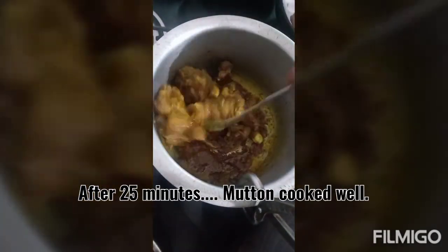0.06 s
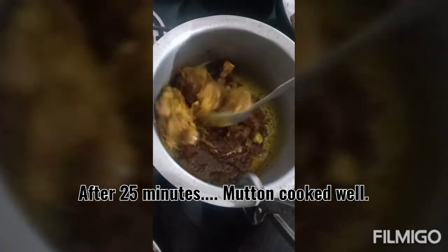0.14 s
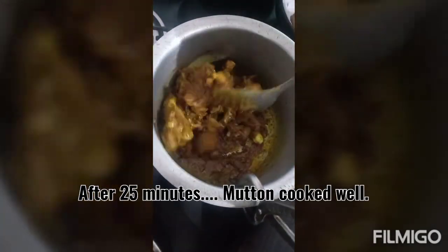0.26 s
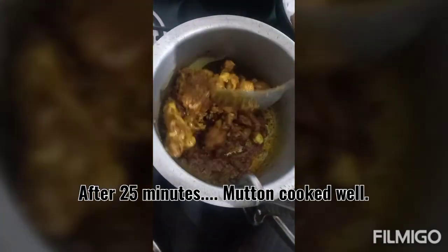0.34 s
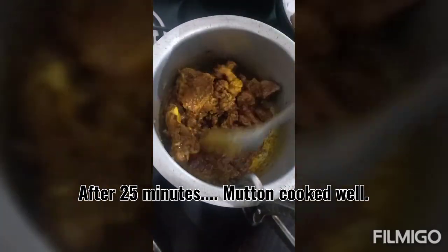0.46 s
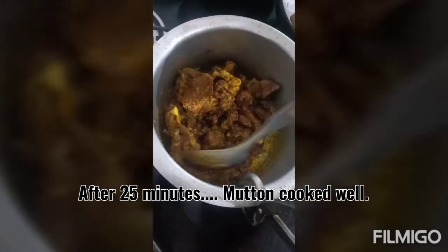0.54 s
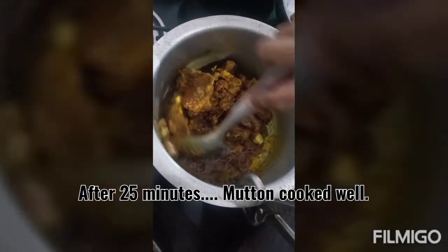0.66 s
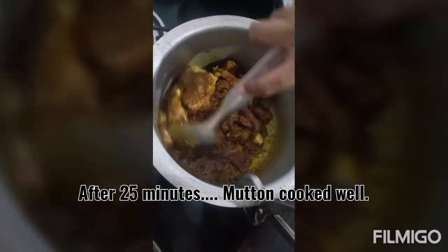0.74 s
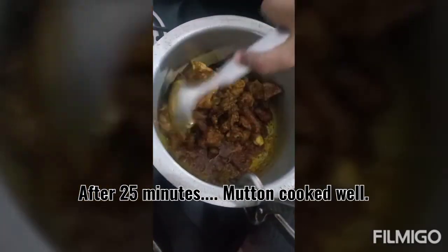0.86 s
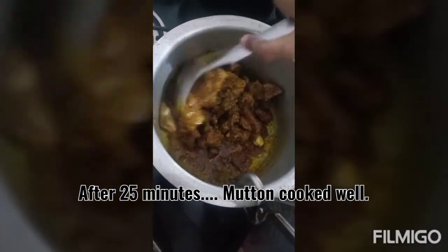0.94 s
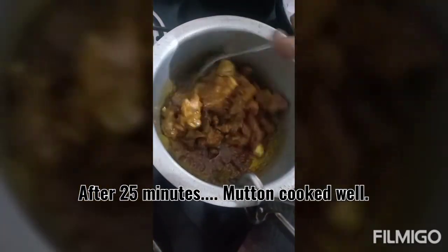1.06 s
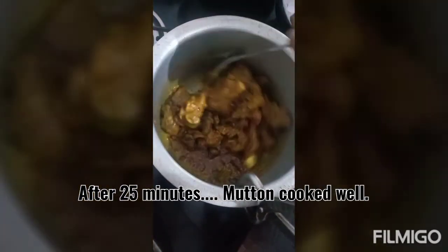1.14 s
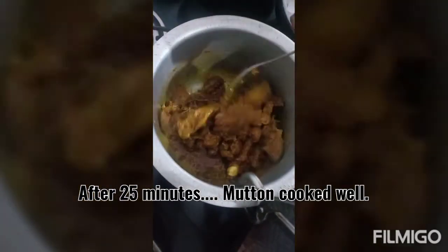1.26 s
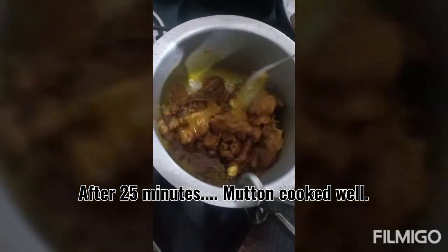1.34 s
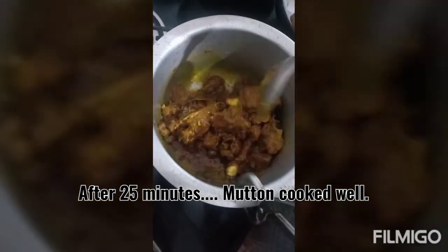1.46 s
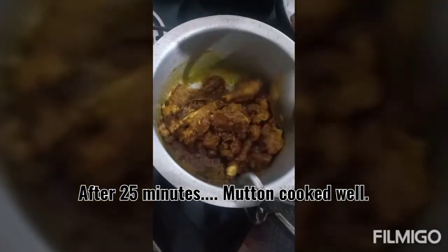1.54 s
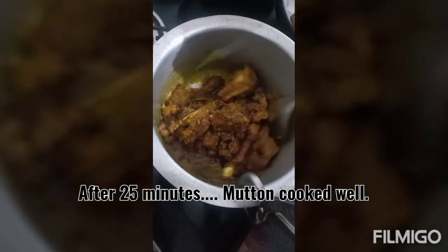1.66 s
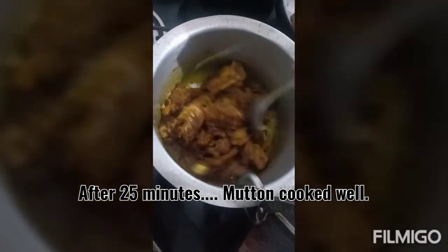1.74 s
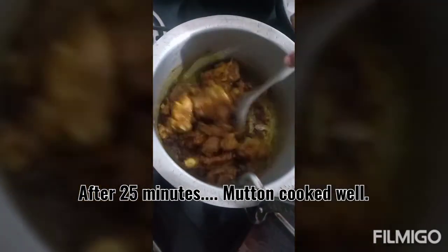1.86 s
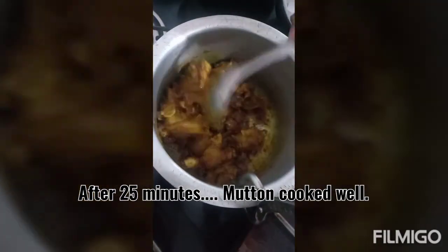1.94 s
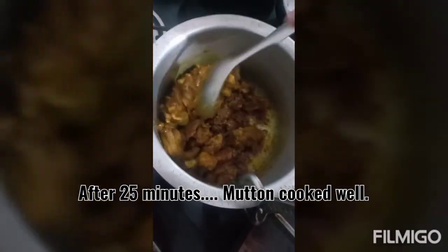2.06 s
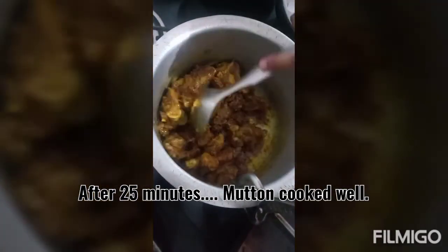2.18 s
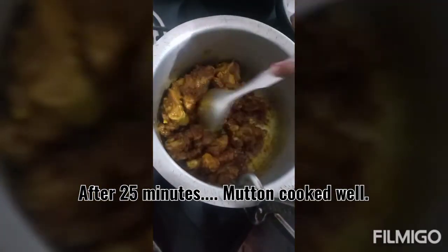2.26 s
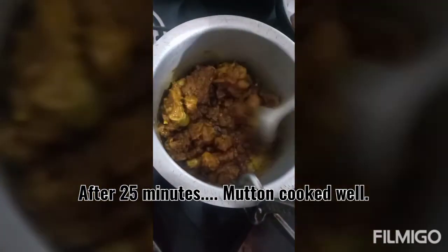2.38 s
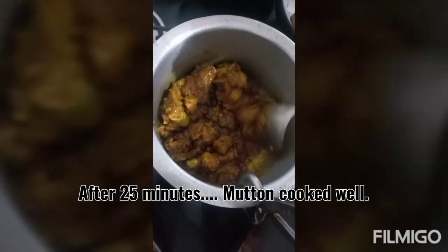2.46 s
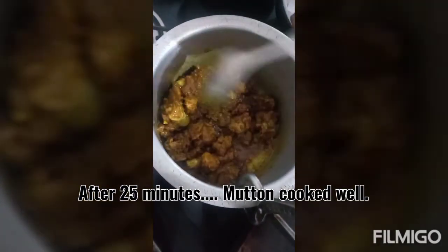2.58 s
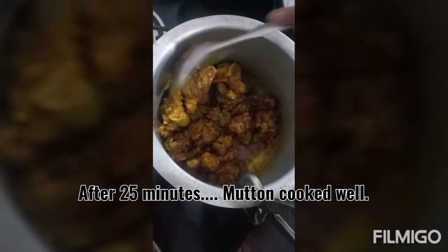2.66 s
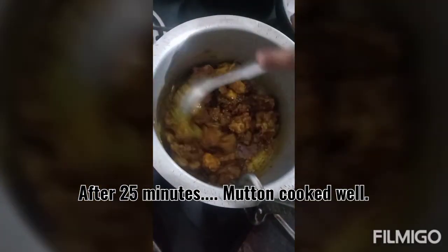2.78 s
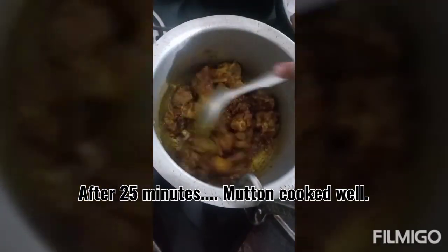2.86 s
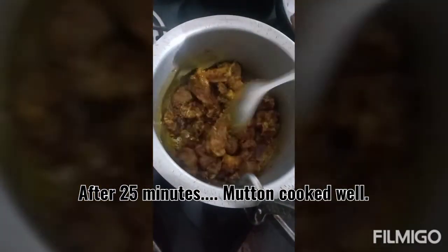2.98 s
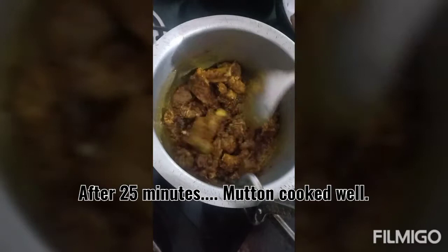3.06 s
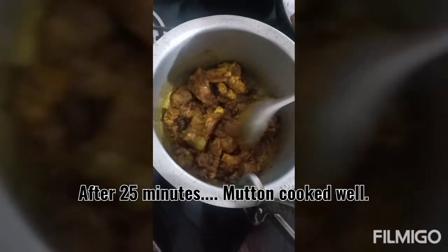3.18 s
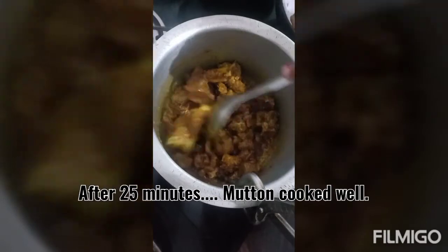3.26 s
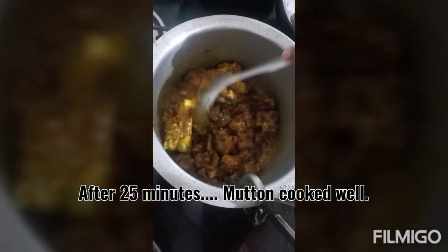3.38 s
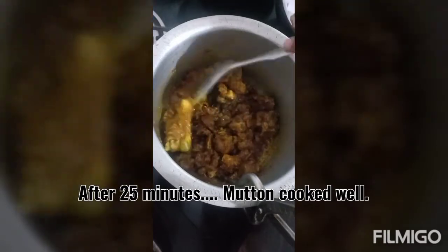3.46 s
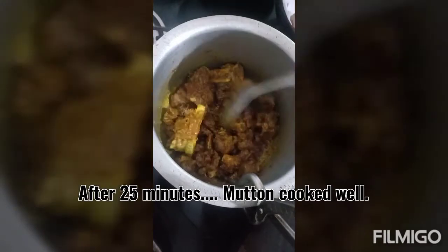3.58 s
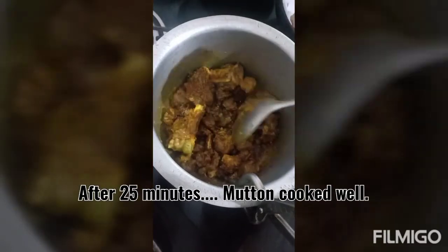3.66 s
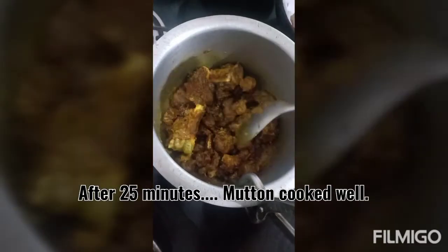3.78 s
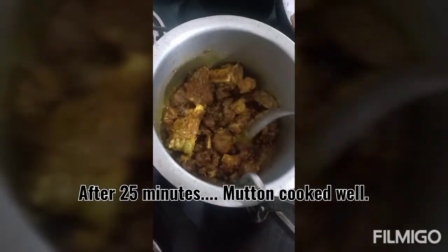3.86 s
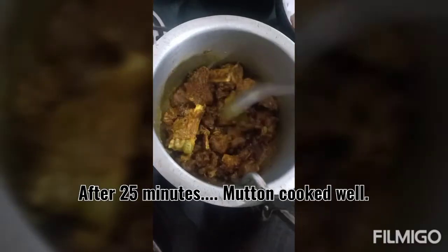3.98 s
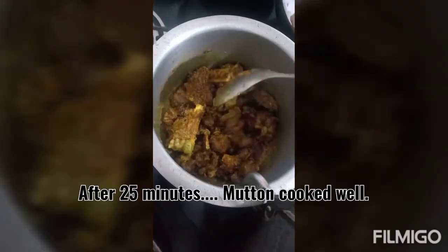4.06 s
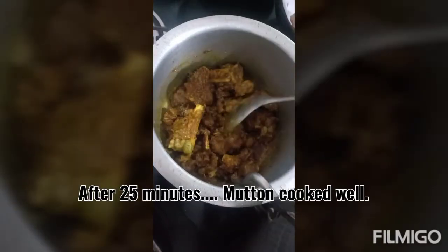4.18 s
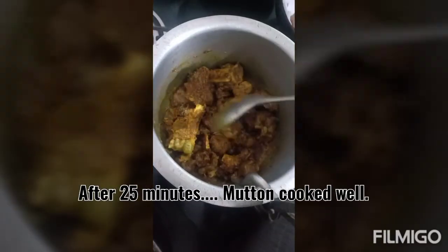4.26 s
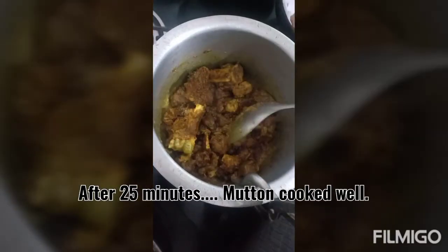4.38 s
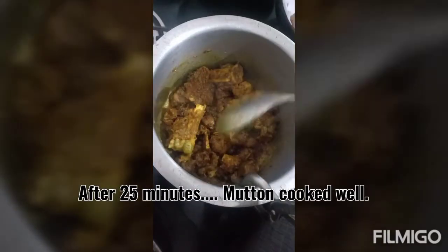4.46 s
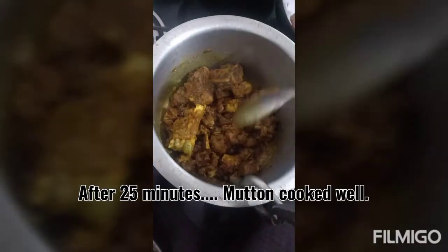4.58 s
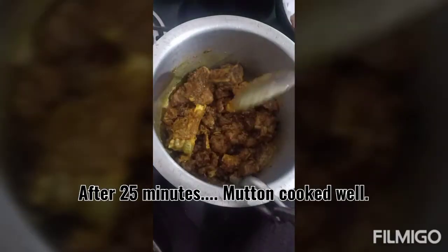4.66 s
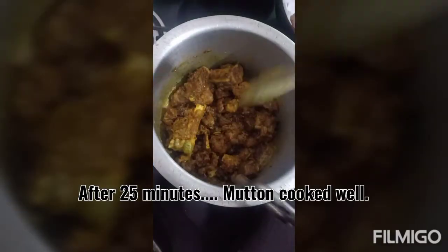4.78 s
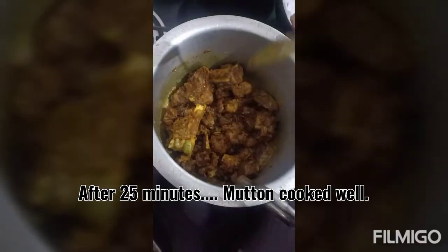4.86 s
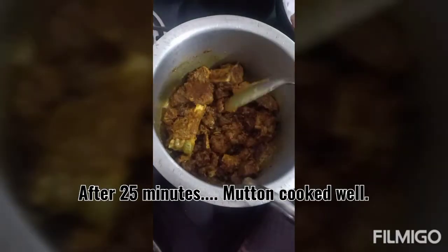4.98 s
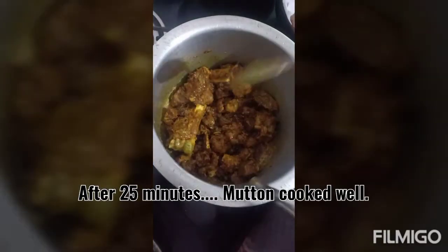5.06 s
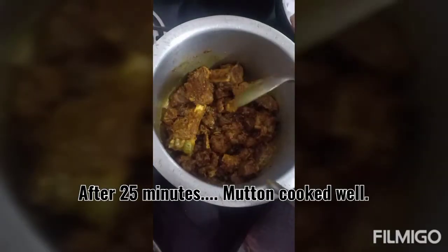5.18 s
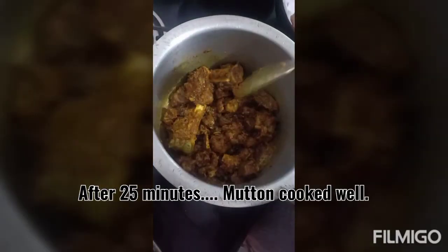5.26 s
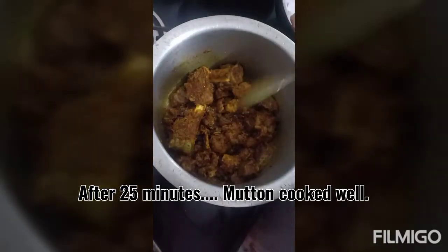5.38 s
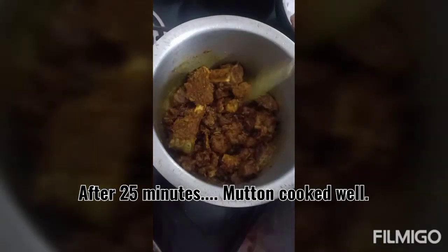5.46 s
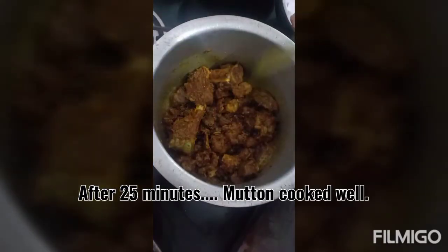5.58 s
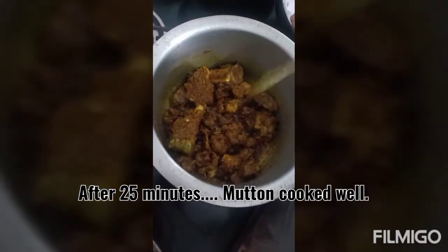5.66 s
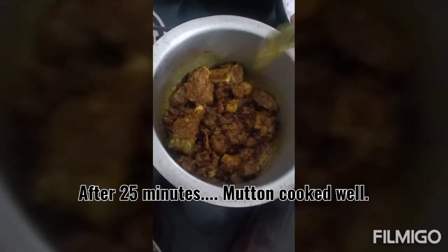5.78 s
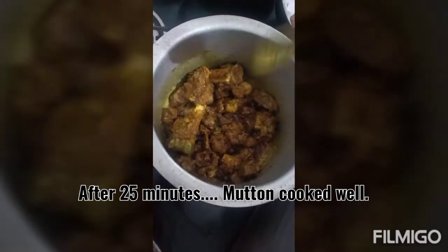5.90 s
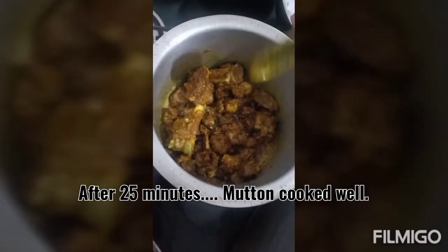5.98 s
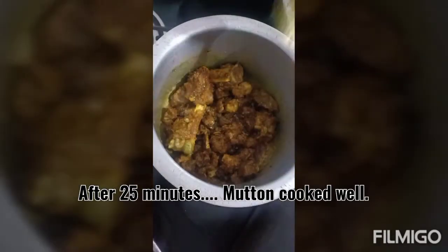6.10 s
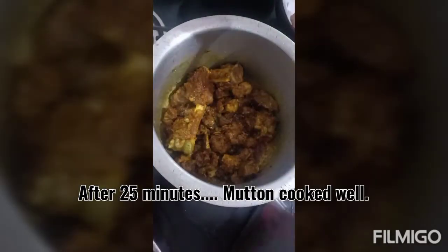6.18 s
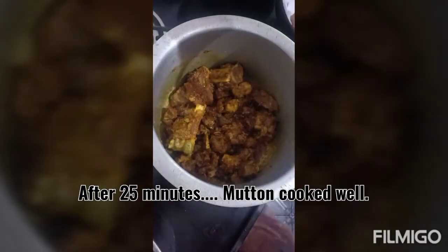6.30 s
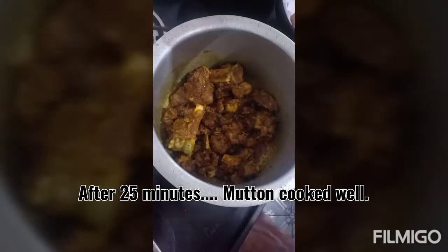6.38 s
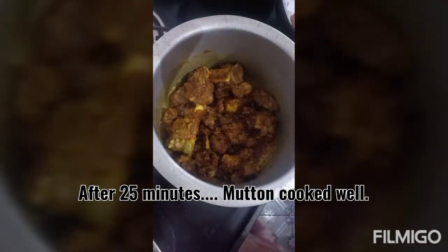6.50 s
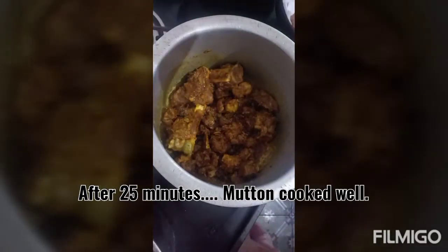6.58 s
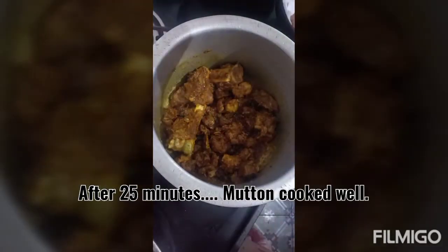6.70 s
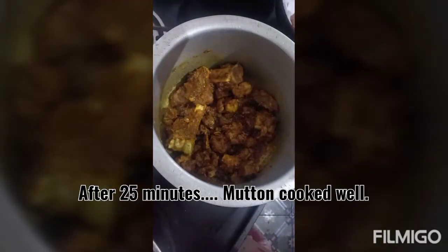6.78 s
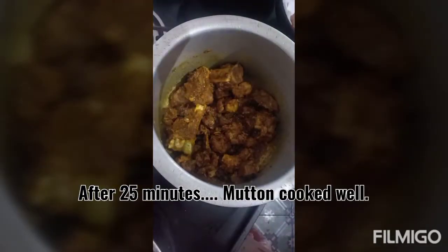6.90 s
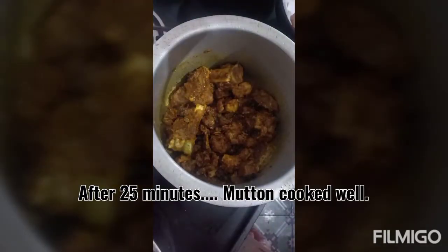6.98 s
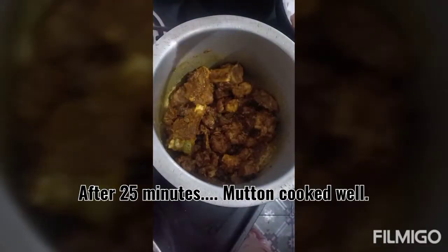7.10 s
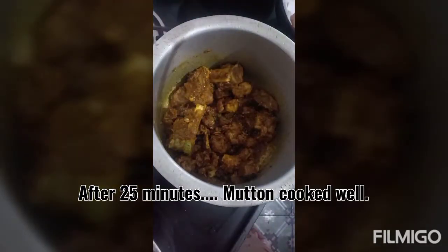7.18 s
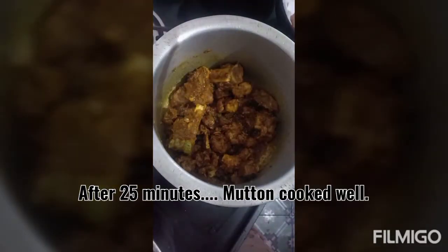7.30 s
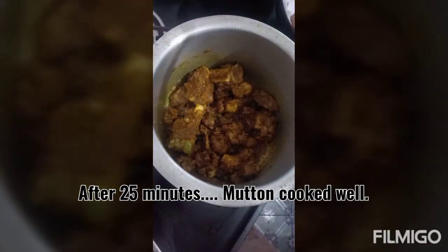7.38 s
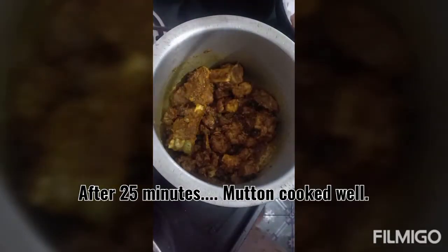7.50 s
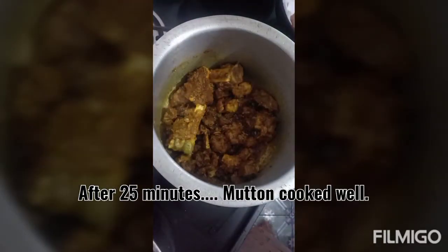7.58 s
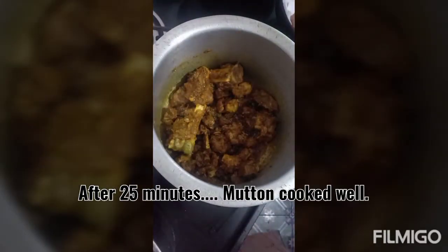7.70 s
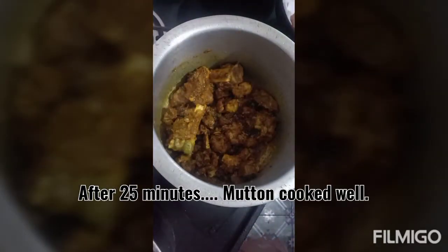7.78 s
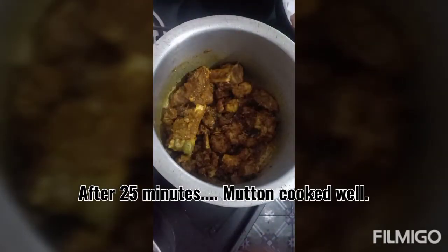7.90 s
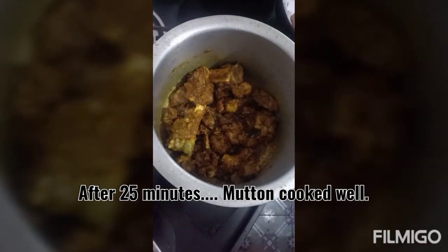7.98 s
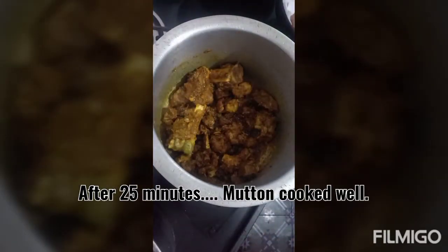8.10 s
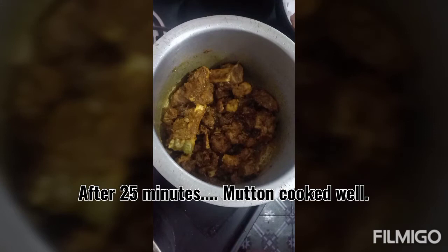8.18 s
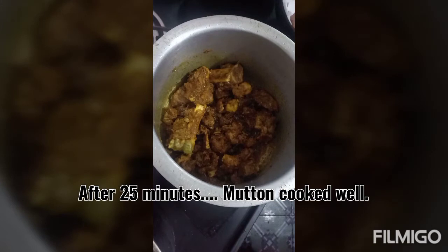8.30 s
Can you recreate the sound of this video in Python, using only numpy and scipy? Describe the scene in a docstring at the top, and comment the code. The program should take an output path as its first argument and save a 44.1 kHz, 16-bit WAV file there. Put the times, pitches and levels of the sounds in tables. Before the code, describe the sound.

A metal ladle stirs thick cooked meat in an aluminium pot, close by in a small, slightly echoing kitchen. It scrapes and bumps the bottom while the gravy squelches softly, and clanks sharply against the side three times. The ladle is then rapped on the rim, which rings briefly. A few quieter clacks and slides follow further off as it is put away. A faint appliance hum and soft hiss continue throughout.

```python
"""A small hard-walled kitchen: a metal ladle stirs thick cooked meat in an aluminium pot.
It scrapes and bumps the bottom while gravy crackles and pops, clanks on the wall, whose modes ring,
and is rapped on the rim to shake it clean. A few clacks and slides follow beside the stove as it is
put away. An appliance hums faintly under soft room hiss."""
import sys
import numpy as np
from scipy import signal
from scipy.fft import rfft, irfft
from scipy.io import wavfile

SR = 44100
rng = np.random.default_rng(int(sys.argv[2]) if len(sys.argv) > 2 else 0)


def log_audio(samples):
    """Write samples as a 16-bit WAV file to the path given in sys.argv[1]."""
    # one column per channel
    frames = np.atleast_2d(samples).T
    # limit to full scale, then quantise
    limited = np.clip(frames, -1, 1)
    pcm = np.round(limited * 32767).astype(np.int16)
    wavfile.write(sys.argv[1], SR, pcm)


N = 368115

# ladle on the bottom, through the meat: start_s, force_db, spot_hz (pitch the struck spot favours)
BOTTOM_BUMPS = [(0.002, -35.5, 626), (0.174, -36, 800), (0.4045, -31.5, 1500), (0.4805, -39.5, 1516),
                (0.555, -42.5, 625), (1.74, -44, 650), (2.291, -44.5, 570), (2.449, -37.5, 560),
                (2.955, -44.5, 560), (2.972, -40, 580), (3.055, -49, 555), (3.985, -43, 590)]
# ladle on the wall: start_s, force_db, bright_db, height_frac, ring_db, spot_hz, damping_ratio
WALL_CLANKS = [(1.0744, -13.5, 10, 0.06, -25, 3600, 1.8), (1.1115, -21.5, -4, 0.18, -24, 630, 2.4),
               (1.7657, -11, 4.5, 0.58, -14, 2250, 6), (1.7987, -26.5, -14, 0, -29.5, 2690, 1.2),
               (1.8208, -20.5, -9, 0.07, -24, 614, 3), (1.8375, -20.5, -13, 0.02, -26.5, 1810, 1.6),
               (3.837, -12.5, -6, 0.08, -21.5, 4200, 4.5), (3.857, -41, -14, .5, -26.5, 2068, 1.09),
               (4.863, -26, -12, 0.74, -31.5, 2080, 2.5), (4.878, -31.5, -16, .9, -36, 2670, 1.4),
               (4.969, -29.5, -11, 0.1, -39.5, 2180, 1.8), (5.136, -11, 8.5, 1, -20.5, 2320, 1.05),
               (5.198, -25, 8, 1, -25.5, 2035, 1.12), (5.2362, -27, 6, 0.8, -26.5, 2540, 1.5),
               (5.26, -18, -4.5, 0.99, -27, 4560, 2)]
def contacts():
    """Yields each blow of the ladle; the higher on the wall, the less thud."""
    for start_s, force_db, spot_hz in BOTTOM_BUMPS:
        thud_db, bright_db, ring_db, damping = 9.5, -3, force_db - 10, 1.11
        yield start_s, force_db, thud_db, bright_db, ring_db, spot_hz, damping
    for start_s, force_db, bright_db, height, ring_db, spot_hz, damping in WALL_CLANKS:
        thud_db = 2.5 - 41 * height
        yield start_s, force_db, thud_db, bright_db, ring_db, spot_hz, damping


# pot bottom: freq_hz, level_db, t60_s
BOTTOM_MODES = [(460, -13, .07), (565, -9, .08), (630, 0, .15), (680, -9, .1), (800, -10, .05)]
# detuning by the meat: time_s, pitch_ratio
MEAT_LOADING = [(0, 0.99), (.17, 1.09), (.44, 0.98), (1.1, 1.06), (1.8, .95), (2.45, 1.02), (3, 0.89),
                (3.85, 0.94)]
def bottom_thud(start_s, damping):
    """The bottom's pitch shifts as meat is pushed over it."""
    pitch_ratio = np.interp(start_s, *np.transpose(MEAT_LOADING))
    return ring(np.array(BOTTOM_MODES) * [pitch_ratio, 1, 1], damping=damping)


# free pot wall: freq_hz, level_db, t60_s
WALL_MODES = [(568, -20, .55), (626, -17, .66), (655, -22, .55), (1511, -9, .66), (2126, -3, .65),
              (2148, -7, .65), (2395, -5, .56), (2605, -7.5, .56), (2795, -15, .48), (4091, -13, .42),
              (4163, -11, .6), (4544, -10, .52), (4768, -12, .6), (5080, -10, .55), (5135, -13, .54),
              (5578, -9, .45), (5988, -10, .6), (6169, -17, .45), (6810, -19, .5)]
# metal on metal: freq_hz, density_db
CLANK_SPECTRUM = [(40, -36), (200, -21), (310, -7.5), (385, -19.5), (470, -1.5), (750, -1.5), (1020, -6),
                  (1750, -7), (2250, 1.5), (3300, -13.5), (5100, -2.5), (6500, -11), (8200, -21.5),
                  (14500, -24.5)]
def blows(overtones=44):
    """Each blow gives a short clank, a bottom thud, a wall ring and a shimmer of high overtones."""
    clanks, thuds, rings = np.zeros((3, 2, N))
    mode_hz = np.array(WALL_MODES)[:, :1]
    high_hz = np.linspace(6900, 14000, overtones) + rng.uniform(-60, 53, overtones)
    high_db = lookup(CLANK_SPECTRUM, high_hz) + rng.normal(0, 3.5, overtones)
    shimmer = ring(np.column_stack([high_hz, high_db, np.full(overtones, .4)]))
    for start_s, force_db, thud_db, bright_db, ring_db, spot_hz, damping in contacts():
        def tone_db(hz):
            modes_db = 7 * bell(hz, mode_hz[3:], .012).max(0)
            edge_db = bright_db * (bell(hz, 22000, 2.8) + 0.48 * bell(hz, 15400, 0.4))
            meat_slap_db = 0.29 * max(thud_db + 9, 0) * bell(hz, 800, 0.18)
            spot_db = 5 * bell(hz, spot_hz, 0.24)
            low_db = 0.37 * thud_db * bell(hz, 490, 0.79)
            return lookup(CLANK_SPECTRUM, hz) + modes_db + edge_db + meat_slap_db + spot_db + low_db
        add(clanks, start_s, amp(force_db) * burst(tone_db, t60_s=0.043))
        add(thuds, start_s, amp(force_db + thud_db - 2.5) * bottom_thud(start_s, damping))
        wall_damping = np.where(mode_hz < 1000, 1, damping)  # the pressing ladle spares the low modes
        wall = ring(WALL_MODES, 15 * bell(mode_hz, spot_hz, 0.063) - 2, wall_damping)
        add(rings, start_s, amp(ring_db) * wall)
        add(rings, start_s, amp(force_db + bright_db - 24.5) * shimmer)
    low_cut = signal.butter(2, 340, "highpass", fs=SR, output="sos")  # thuds and rings carry little deep bass
    thuds, rings = signal.sosfilt(low_cut, [thuds, rings])
    return clanks + thuds + rings + kitchen(amp(-2) * clanks + amp(-5) * thuds + amp(-9) * rings)


def rim_note(start_s=5.165, pitch_hz=1515.5, level_db=-16.5, t60_s=0.57, swells_per_s=3.73):
    """The rap's note travels round the rim, so it swells after the blow, then fades."""
    out = np.zeros((2, N))
    note = ring([(pitch_hz, level_db, t60_s)])
    swell = np.sin(np.pi * swells_per_s * np.arange(note.shape[1]) / SR)
    add(out, start_s, note * swell)
    return out + amp(-14.5) * kitchen(out)


# hand-held bowl and shank: freq_hz, level_db, t60_s
LADLE_MODES = [(2200, -3, .1), (2262, -2, .2), (2420, -3, .18), (2802, -2, .22), (3280, -12, .18),
               (3800, -7, .2), (4341, -5, .18), (4420, -7, .15), (4983, -5, .17), (5134, -6, .18),
               (5215, -4, .2), (6200, -11, .18), (6850, -10, .2)]
# ladle skipping: start_s, length_s, rattle_db, bright_db, ring_db
CHATTERS = [(1.077, 0.05, -29.5, -11, -21), (1.784, 0.051, -30, 9, -30), (5.17, 0.098, -28.5, 10, -42)]
def chatter(hits_per_s=260, size=16384):
    """After a hard blow the ladle rings and skips along the metal in tiny uneven contacts."""
    out, t = np.zeros((2, N)), np.arange(size) / SR
    for start_s, length_s, rattle_db, bright_db, ring_db in CHATTERS:
        def tone_db(hz):
            modes_db = 15 * bell(hz, np.array(LADLE_MODES)[:, :1], .008).max(0)
            mid_db = 5 * bell(hz, 2500, 0.16) - 12 * bell(hz, 580, 1)
            return lookup(CLANK_SPECTRUM, hz) + modes_db + mid_db + bright_db * bell(hz, 12200, 0.54)
        hits = rng.standard_normal((2, size)) * (rng.random(size) < hits_per_s / SR)
        rattle = unit_rms(colour(stereo(hits, coherence=0.25), tone_db))
        add(out, start_s, amp(rattle_db) * rattle * fade(np.maximum(t - length_s, 0), t60_s=0.084))
        add(out, start_s, amp(ring_db) * ring(LADLE_MODES))
    return out + amp(-5) * kitchen(out)


# stove knock: freq_hz, density_db
STOVE_SPECTRUM = [(25, -23), (60, -19), (120, -7.5), (165, -17), (215, -9), (310, -3.5), (385, -12),
                  (490, 1.5), (800, -21), (2000, -30)]
def stove_jolts():
    """Each wall clank knocks the stove under the pot, most of all from the rim."""
    out = np.zeros((2, N))
    for start_s, force_db, _, height, *_ in WALL_CLANKS:
        knock = diffuse(burst(lambda hz: lookup(STOVE_SPECTRUM, hz), t60_s=0.019))
        rim_db = 10.5 * height ** 6
        add(out, start_s, amp(force_db - 25 + rim_db) * knock)
    return out + amp(-1.5) * kitchen(out)


# wet contacts: start_s, level_db, pitch_hz, width_oct
MEAT_TICKS = [(0.4055, -21.5, 1080, 0.55), (0.4805, -33.5, 1020, 1.2), (0.5993, -35.5, 5500, 2.9),
              (1.037, -30, 2450, 0.6), (1.043, -37, 2450, 0.46), (1.702, -38, 1900, 1.9),
              (1.716, -32, 1000, 2.4), (1.74, -30.5, 1740, 0.91), (2.29, -37, 2260, 1),
              (2.493, -31.5, 1110, 0.22), (2.63, -39.5, 4530, 0.4), (2.679, -43, 2900, 0.23),
              (3.65, -38.5, 3760, 1.5), (3.818, -32, 1290, 1.1), (4.2871, -30, 2100, 1.43),
              (4.298, -38.5, 1250, 0.078), (4.316, -39.5, 5260, 0.54)]
def meat_ticks():
    """Bone and meat tick and slap on the ladle; the wall stays silent."""
    out = np.zeros((2, N))
    for start_s, level_db, pitch_hz, width_oct in MEAT_TICKS:
        add(out, start_s, amp(level_db) * burst(lambda hz: wet_db(hz, pitch_hz, width_oct), t60_s=0.026))
    return out + amp(-9) * kitchen(out)


# ladle through the meat: start_s, length_s, meat_db, drag_db
STROKES = [(-.05, 0.26, -48.5, -33), (0.762, 0.18, -46, -52), (1.841, 0.59, -52.5, -38),
           (2.383, 0.16, -45.5, -46.5), (2.904, 0.12, -48, -54), (3.295, 0.17, -51, -49.5),
           (3.614, 0.17, -50, -109), (4.125, 0.22, -54, -58.5), (4.558, 0.13, -49, -54)]
STIR_END_S, ATTACK_S = 4.15, 0.027
def meat_motion(stirred_db=-52, rest_db=-61, settle_db_per_s=4.5):
    """Meat envelope: strokes over gravy that keeps crackling, then settles."""
    settling_s = np.maximum(np.arange(N) / SR - STIR_END_S, 0)
    gravy = amp(np.maximum(stirred_db - settle_db_per_s * settling_s, rest_db))
    power = sum((amp(db) * push(start_s, length_s)) ** 2 for start_s, length_s, db, _ in STROKES)
    return np.sqrt(gravy ** 2 + power)


def ladle_drag():
    """Scrape envelope: light brushing, plus a bite as each stroke starts."""
    brushing = amp(-57.5) * push(0, STIR_END_S, t60_s=8.2)
    power = sum((amp(db) * push(start_s, ATTACK_S, t60_s=0.64)) ** 2 for start_s, _, _, db in STROKES)
    return np.sqrt(brushing ** 2 + power)


# ladle on the bottom: freq_hz, density_db
SCRAPE_SPECTRUM = [(100, -24.5), (350, -14.5), (520, -10), (630, -4), (850, -14.5), (1300, -5), (1800, -22),
                   (2250, -11), (3400, -26), (5000, -28), (8000, -55)]
# wet meat: freq_hz, density_db
SQUELCH_SPECTRUM = [(200, -11), (700, -3.5), (1300, -11), (1700, -3), (2400, 2.5), (3400, -5.5), (5200, -2),
                    (6800, -11), (8500, -42), (13500, -17), (16000, -34)]
def stirring():
    """Slips on the bottom scrape hollowly, wet meat crackles; both set the wall singing faintly."""
    slips = grains(per_s=1400, spread_db=3)
    scrape = colour(slips, lambda hz: lookup(SCRAPE_SPECTRUM, hz) + 5 * bell(hz, 625, .1))
    squelch = colour(grains(per_s=1700, spread_db=4.2), lambda hz: lookup(SQUELCH_SPECTRUM, hz))
    rub = unit_rms(scrape) * ladle_drag() + unit_rms(squelch) * meat_motion() + gravy_pops()
    wall = ring(WALL_MODES, damping=10)
    singing = signal.fftconvolve(rub, wall / np.linalg.norm(wall[0]), axes=1)[:, :N]
    return rub + amp(-23) * singing + amp(-2) * kitchen(rub)


def gravy_pops(per_s=28):
    """Pockets of gravy part with short pops of random pitch as the meat moves."""
    out, motion = np.zeros((2, N)), meat_motion()
    for when, decades, strength in rng.random((int(per_s * N / SR), 3)):
        at, pitch_hz = int(when * N), 700 * 10 ** decades
        pop = burst(lambda hz: wet_db(hz, pitch_hz, .6), t60_s=.014, size=2048)
        add(out, at / SR, motion[at] * amp(14 * strength ** 2 - 12) * pop)
    return out


# ladle edge on the wall: start_s, length_s, level_db
WALL_RUBS = [(2.283, 0.039, -47), (2.92, .08, -56), (4.585, 0.15, -48)]
def wall_rubs(pitch_hz=2180):
    """The ladle's edge slips along bare metal; the wall sings softly."""
    weights_db = 13 * bell(np.array(WALL_MODES)[:, :1], pitch_hz, 0.082)
    wall = ring(WALL_MODES, weights_db, damping=4)
    singing = unit_rms(signal.fftconvolve(grains(per_s=640, spread_db=3.5), wall, axes=1)[:, :N])
    envelope = sum(amp(db) * push(start_s, length_s, t60_s=0.26) for start_s, length_s, db in WALL_RUBS)
    out = singing * envelope
    return out + amp(-7.5) * kitchen(out)


# knocks beside the stove: start_s, force_db, body_hz, bright_db, metal_hz, t60_s
CLACKS = [(6.126, -40.5, 666, 25, 12940, 0.046), (6.693, -35, 259, -3.5, 6500, 0.026),
          (6.76, -43, 262, -4, 2660, 0.089), (7.157, -42.5, 742, -3.5, 5500, 0.059),
          (7.327, -26, 324.4, -7.5, 5520, 0.062), (7.351, -32.5, 420, 5, 5600, 0.044),
          (7.368, -36, 310, -2, 5600, 0.071), (7.569, -43, 703, -19, 5540, 0.021),
          (7.611, -52.5, 696, -22, 5600, 0.024)]
# hard contact: freq_hz, density_db
CLACK_SPECTRUM = [(40, -23), (150, -14.5), (310, -2.5), (470, 1.5), (590, 2), (750, 6), (1150, -0.5),
                  (2500, 5), (3300, -6), (4600, -4.5), (5600, -3.5), (6700, -9), (8700, -16), (10000, -27),
                  (12500, -10.5), (15000, -30)]
# metal ring: freq_ratio, level_db
METAL_BANDS = [(1, 10.5), (1.53, 9.5), (2.09, 7.5), (2.33, 7)]
# hollow body: freq_ratio, level_db, t60_s
BODY_MODES = [(0.999, -0.5, 0.11), (1.7, -2.5, 0.055), (2.2, -18, .1), (2.9, -8.5, 0.11)]
def clacks():
    """Hard things knock: a broad clack with narrow metal bands; the duller, the more body."""
    out = np.zeros((2, N))
    for start_s, force_db, body_hz, bright_db, metal_hz, t60_s in CLACKS:
        def tone_db(hz):
            metal_db = sum(db * bell(hz, metal_hz * ratio, 0.074) for ratio, db in METAL_BANDS)
            return lookup(CLACK_SPECTRUM, hz) + bright_db * bell(hz, 10000, 1.4) + metal_db
        body = ring(np.array(BODY_MODES) * [body_hz, 1, 1])
        add(out, start_s, amp(force_db) * burst(tone_db, t60_s))
        add(out, start_s, amp(force_db - 11 - 0.6 * bright_db) * body)
    return out


# piece of metalware: freq_hz, level_db, t60_s
METALWARE_MODES = [(706, -3, 1.1), (1760, 2, .25), (2578, -3, .6), (4344, -7, .24), (5507, -3, .65),
                   (5690, -6, .5), (8420, -12, .5), (12580, -8, .25), (13050, -14, .5)]
def metalware(start_s=7.329):
    """Metalware rings as it is set down."""
    out = np.zeros((2, N))
    add(out, start_s, amp(-48.5) * ring(METALWARE_MODES))
    return out


# sliding beside the stove: start_s, length_s, level_db, rasp_hz
SLIDES = [(6.704, 0.28, -59.5, 2600), (7.13, 0.18, -62, 2400)]
def slides(handling_start_s=7.1):
    """Things rasp as they slide; faint handling runs to the end."""
    def tone_db(hz):
        return lookup(CLACK_SPECTRUM, hz) + 4 * bell(hz, 4400, 0.6) - 10 * bell(hz, 12000, 0.58)
    rub = colour(grains(per_s=3000, spread_db=3), tone_db)
    out = amp(-64.5) * unit_rms(rub) * push(handling_start_s, N / SR)
    for start_s, length_s, level_db, rasp_hz in SLIDES:
        rasp = unit_rms(colour(rub, lambda hz: 7 * bell(hz, rasp_hz, 0.25)))
        out += amp(level_db) * rasp * push(start_s, length_s)
    return out


# room decay: freq_hz, t60_s
KITCHEN_DECAY = [(100, 0.99), (400, 0.69), (1000, 0.65), (2800, 0.59), (7300, 0.55), (15000, 0.3)]
def kitchen(x, gap_samples=22):
    """Dense wall reflections of random sign, each band dying at its own rate."""
    taps = np.zeros((2, SR))
    slots = np.arange(10 * gap_samples, SR - gap_samples, gap_samples)
    arrivals = slots + rng.integers(0, gap_samples, (2, len(slots)))
    np.put_along_axis(taps, arrivals, rng.choice([-1., 1.], arrivals.shape), 1)
    hz, t, bands = signal.stft(diffuse(taps), SR, nperseg=256)
    tail = signal.istft(bands * fade(t, lookup(KITCHEN_DECAY, hz)[:, None]), SR)[1]
    return signal.fftconvolve(x, tail / np.linalg.norm(tail[0]), axes=1)[:, :N]


# room air: freq_hz, density_db
HISS_SPECTRUM = [(15, -107), (25, -65), (53, -27), (102, -6.5), (236, -8), (270, -5.5), (384, -13),
                 (641, -8), (988, -15.5), (1610, -17), (2050, -19.5), (5140, -14.5), (7920, -33),
                 (14000, -105), (16000, -72)]
def room_hiss():
    """Soft steady noise from all sides."""
    noise = diffuse(rng.standard_normal((2, N)))
    return amp(-53) * unit_rms(colour(noise, lambda hz: lookup(HISS_SPECTRUM, hz)))


# appliance: centre_hz, level_db, width_hz
HUM_BANDS = [(92.5, -64.5, 9.9), (116.3, -60.5, 7.1), (315.6, -71, 11), (570, -88, 15), (682, -69, 3.5)]
def appliance_hum():
    """Narrow noise bands make an unsteady low hum."""
    hz = np.fft.rfftfreq(N, 1 / SR)
    noise = rfft(diffuse(rng.standard_normal((2, N))))
    return sum(amp(level_db) * unit_rms(irfft(noise / (1 + (2 * (hz - centre_hz) / width_hz) ** 2), N))
               for centre_hz, level_db, width_hz in HUM_BANDS)


# left-right likeness of diffuse sound: freq_hz, coherence_frac
COHERENCE = [(30, 0.033), (80, 1), (130, 0.91), (290, 0.86), (640, 0.71), (1400, 0)]
def diffuse(x):
    """Sound from all sides: long waves reach both channels alike."""
    own, right = rfft(x)
    coherence = lookup(COHERENCE, np.fft.rfftfreq(x.shape[1], 1 / SR))
    left = coherence * right + np.sqrt(1 - coherence ** 2) * own
    return irfft(np.array([left, right]), x.shape[1])


def stereo(x, coherence, lag_samples=9):
    """Makes two independent signals partly alike; the left lags."""
    left = coherence * x[1] + np.sqrt(1 - coherence ** 2) * x[0]
    return np.array([np.pad(left, (lag_samples, 0))[:len(left)], x[1]])


def ring(modes, weights_db=0, damping=1):
    """Struck modes swing up from rest and decay; the left lags in phase."""
    hz, db, t60_s = np.transpose(modes)[:, :, None]
    t = np.arange(int(.7 * SR)) / SR
    lag_rad = 1.15 * np.tanh(hz[:, 0] / 900)
    phases = np.exp(-1j * np.array([lag_rad, np.zeros_like(lag_rad)]))
    waves = amp(db + weights_db) * np.exp((2j * np.pi * hz - np.log(1000) * damping / t60_s) * t)
    return (phases @ waves).imag * (1 - np.exp(-t / 0.00088))


def burst(tone_db, t60_s, size=8192):
    """A contact: a sharp snap and a crowd of damped modes; unit rms over the first 5 ms."""
    t = np.arange(size) / SR
    crowd = rng.standard_normal((2, size)) * fade(t, t60_s) * (1 - np.exp(-t / 0.00045))
    snap = np.array([[0], [0.31]]) * (np.arange(size) == SR // 1000)
    x = colour(stereo(crowd + snap, coherence=0.2), tone_db)
    return x / np.sqrt(np.mean(x[:, :SR // 200] ** 2))


def grains(per_s, spread_db):
    """Tiny random slips and pops of uneven size."""
    sizes = amp(spread_db * np.minimum(rng.exponential(1, N), 4))
    fires = rng.random(N) < per_s / SR
    return stereo(sizes * fires * rng.standard_normal((2, N)), coherence=0.19)


def push(start_s, length_s, t60_s=0.33):
    """Hand movement: attack, hold, release."""
    t = np.arange(N) / SR - start_s
    return np.clip(t / ATTACK_S, 0, 1) * fade(np.maximum(t - length_s, 0), t60_s)


def wet_db(hz, pitch_hz, width_oct):
    """Wet contact spectrum: one hump, muffled top."""
    return 30 * bell(hz, pitch_hz, width_oct) - 13 * bell(hz, 9900, 0.3)


def colour(x, tone_db, size=2048):
    """Causal filter with gain tone_db(hz)."""
    log_gain = np.log(amp(tone_db(abs(np.fft.fftfreq(size, 1 / SR)))))
    taps = np.fft.ifft(np.exp(np.conj(signal.hilbert(log_gain)))).real[:size // 2]
    return signal.oaconvolve(x, taps[None], axes=1)[:, :x.shape[1]]


def lookup(table, hz):
    """Interpolates over log frequency."""
    freq_hz, value = np.transpose(table)
    return np.interp(np.log(hz + 1), np.log(freq_hz + 1), value)


def bell(hz, centre_hz, width_oct):
    """Unit-height bell over log frequency."""
    return np.exp(-.5 * (np.log2((hz + 1) / centre_hz) / width_oct) ** 2)


def fade(t, t60_s):
    """Exponential decay."""
    return np.exp(-np.log(1000) * t / t60_s)


def amp(db):
    """Decibels to gain."""
    return 10 ** (np.asarray(db) / 20)


def unit_rms(x):
    """Scales to rms 1."""
    return x / np.sqrt(np.mean(x ** 2) + 1e-20)


def add(mix, start_s, sound):
    """Mixes in a stereo sound."""
    part = mix[:, round(start_s * SR):][:, :sound.shape[1]]
    part += sound[:, :part.shape[1]]


def scene():
    """Pot slightly right; the clacks are further off, with more room than direct sound."""
    pot = blows() + rim_note() + chatter() + stove_jolts() + meat_ticks() + stirring() + wall_rubs()
    tidying = slides() + clacks() + metalware()
    beside_stove = amp(3.5) * tidying + amp(4) * kitchen(tidying)
    background = room_hiss() * amp([[-2.5], [-1]]) + appliance_hum() * amp([[-1.8], [1.4]])
    return pot * amp([[-1.3], [1.2]]) + beside_stove * amp([[-.6], [.6]]) + background


def record(dry):
    """Soft overload on the loudest clanks, then a band limit."""
    ceiling, cutoff_hz = .95, 15900
    limited = ceiling * np.tanh(dry / ceiling)
    lowpass = signal.firwin(255, cutoff_hz, window=("kaiser", 9), fs=SR)
    return signal.oaconvolve(limited, lowpass[None], "same")


dry = scene()
out = record(dry)
log_audio(out)
```